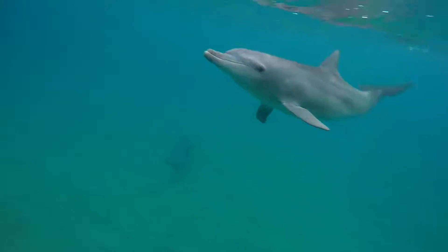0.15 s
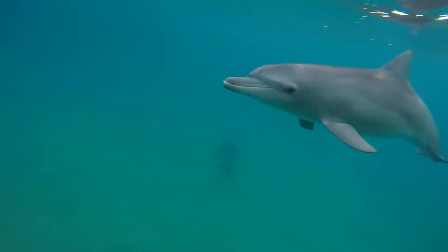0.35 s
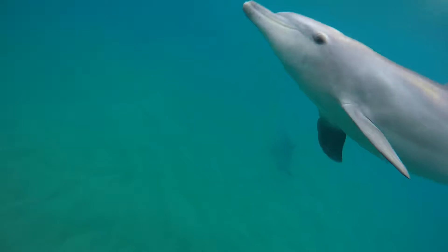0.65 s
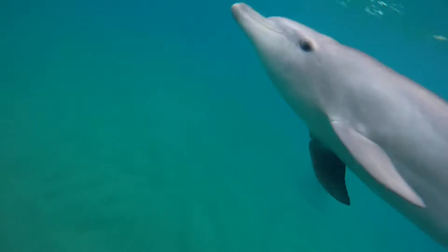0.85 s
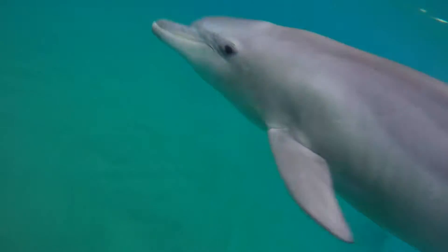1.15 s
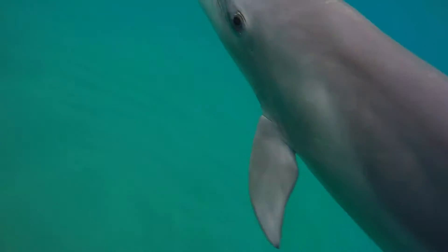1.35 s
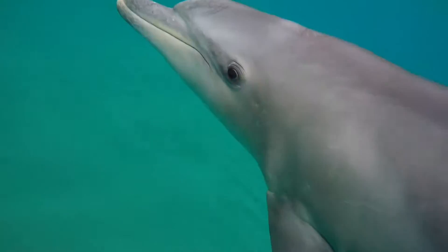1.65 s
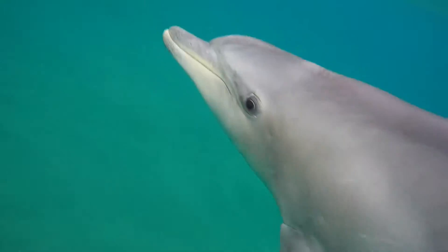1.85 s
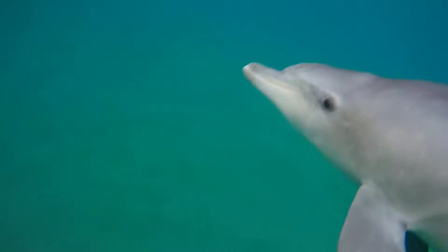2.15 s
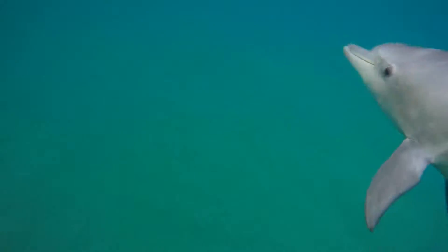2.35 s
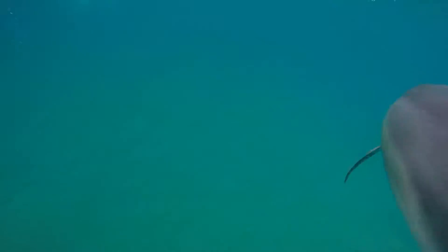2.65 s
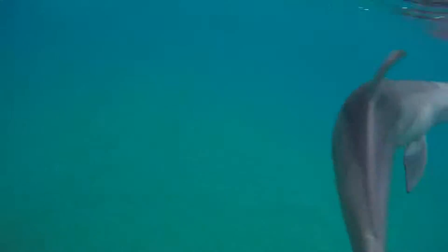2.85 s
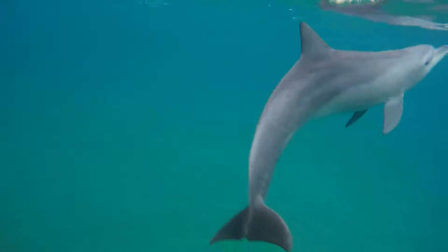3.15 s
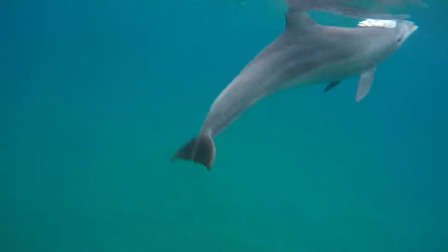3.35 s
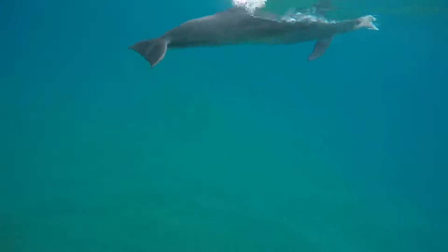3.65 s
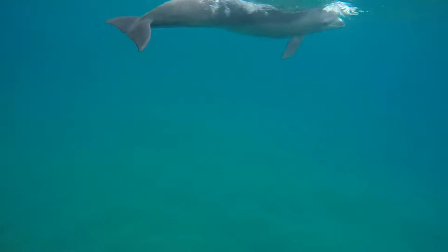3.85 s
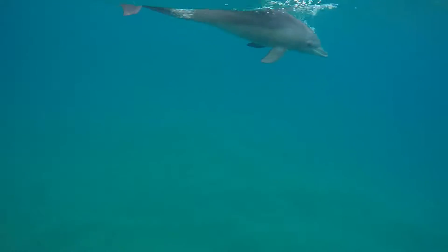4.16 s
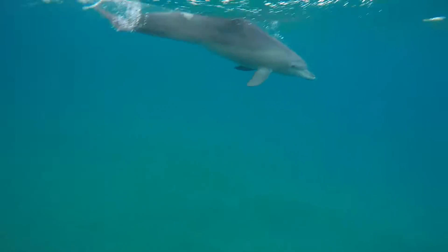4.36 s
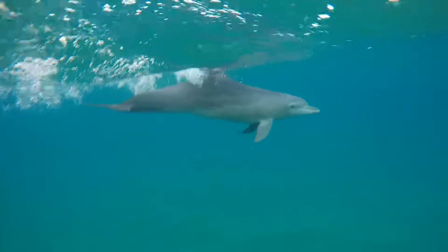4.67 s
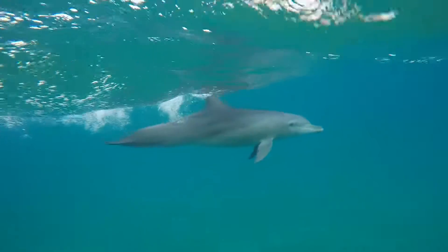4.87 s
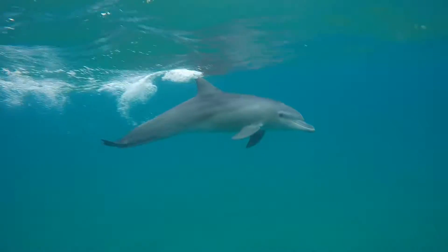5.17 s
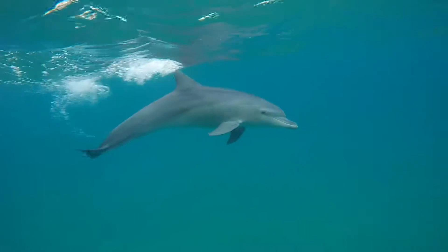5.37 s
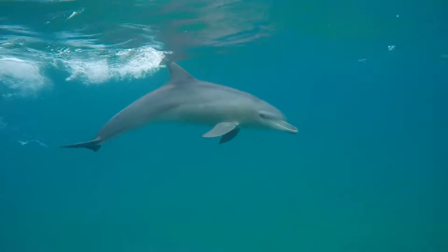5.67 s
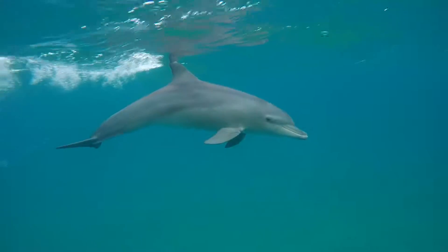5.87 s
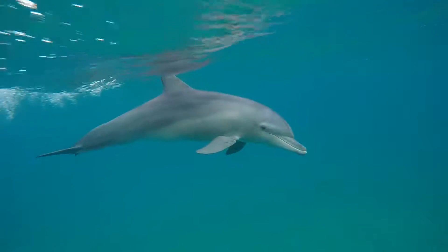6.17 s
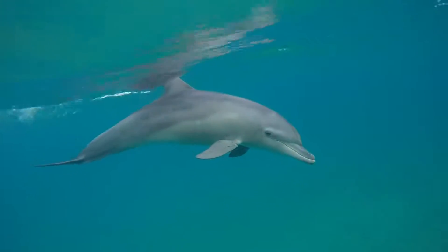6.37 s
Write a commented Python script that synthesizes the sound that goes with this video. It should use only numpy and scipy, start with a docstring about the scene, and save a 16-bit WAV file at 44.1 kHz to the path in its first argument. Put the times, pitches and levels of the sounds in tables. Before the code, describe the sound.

Underwater rumble and bubbly gurgling as a dolphin passes close, whistling, popping and clicking, then a short surface splash and two rising chirps.

```python
"""Water rumbles round a submerged housing in the open sea, and the surface gurgles, splashes and fizzes.
A dolphin passes close and rises: it whistles, fires a burst of pulses and a click train, then whistles twice.
A low hum sounds briefly during the clicks. Whistles and hum are gliding sines; pulses ring housing modes;
clicks are filtered impulses. Bubbles are damped sines; flow, wash, hiss and splash are shaped noise."""
import sys
import numpy as np
from scipy import signal
from scipy.fft import rfft, irfft, next_fast_len
from scipy.io import wavfile
from scipy.ndimage import uniform_filter1d, map_coordinates

SR = 44100
rng = np.random.default_rng(int(sys.argv[2]) if len(sys.argv) > 2 else 0)


def pcm_store(signal):
    """Save signal as 16-bit PCM."""
    levels = np.round(np.clip(np.atleast_2d(signal), -1, 1) * 32767)
    wavfile.write(sys.argv[1], SR, levels.astype(np.int16).T)


N = 287532

# whistle pitch, an arch and two upsweeps, one list each: time_s, pitch_hz
WHISTLE_PITCH = [
    [(.655, 6400), (.70, 6750), (.77, 10000), (.83, 11760), (.852, 13700), (.94, 15200), (.98, 14850),
     (1.054, 12200), (1.078, 11100), (1.178, 7760), (1.235, 7600)],
    [(5.52, 3940), (5.545, 4360), (5.56, 5570), (5.59, 6520), (5.65, 7100), (5.685, 8000), (5.725, 8700)],
    [(5.98, 2780), (6.03, 3550), (6.065, 5090), (6.125, 6720), (6.185, 7907), (6.28, 11050)],
]
# the same three whistles, before passage and edges: level_db, overtone_re_level_db, start_roughness_0_to_1
WHISTLE_LEVELS = [(-43, -1, 0.4), (-40.5, -23, 0.94), (-40.5, -13, 1)]
# how the housing passes a whistle, which swells and fades as it glides through: frequency_hz, gain_db
HOUSING_PASSAGE = [(2800, -14.5), (3500, 1.5), (4450, -6.5), (4950, -15.5), (5700, -4), (6700, -7.5),
                   (7900, -18), (9300, -7.5), (10400, -16), (11200, -7), (12000, -26), (13500, -15),
                   (14400, -11), (15300, -24)]
# pulses, weak to loud; the first is the housing ringing under the lone click:
# start_s, strength_db, brightness_db
PULSES = [(1.0699, -24.5, -1), (1.3657, -26, 8), (1.3712, -21, 14.5), (1.3767, -18.5, 13.5),
          (1.3831, -20.5, 15), (1.3892, -10, 7), (1.3963, -10.5, 4), (1.404, -19.5, 10),
          (1.4159, -20.5, 13), (1.4993, -6, 1), (1.5637, -6.5, -4.5), (1.5714, -10, -4), (1.5866, -10, -10)]
# housing modes rung by a pulse: frequency_hz, gain_db, t60_s
HOUSING_MODES = [(1010, -14.5, 0.016), (1177, -4.5, 0.0066), (1880, -15.5, 0.0077), (2655, -16, 0.028),
                 (2890, -3, 0.019), (4100, -12, 0.0066), (4950, -10, 0.0022), (6630, -16.5, 0.0021),
                 (9000, -23, 0.0025), (12940, -28, 0.00078)]
# echolocation train, quickening and then slackening: start_s, knock_peak_db
CLICKS = [(1.6302, -20.5), (1.7014, -13.5), (1.7906, -9.5), (1.8868, -9.5), (1.9758, -12.5), (2.034, -14),
          (2.0759, -13.5), (2.116, -14), (2.151, -14), (2.1878, -15.5), (2.226, -17), (2.2748, -18.5),
          (2.347, -24)]
# one harder click before the train: start_s, knock_peak_db, knock_top_hz
LONE_CLICK = (1.07, -5.5, 4240)
# low hum: time_s, pitch_hz
HUM_PITCH = [(1.91, 294.3), (1.98, 305), (2.03, 280.2), (2.13, 303.8), (2.22, 290.7), (2.38, 319)]
# the dolphin's back breaks the surface: time_s, level_db
SPLASH_LEVEL = [(3.12, -64), (3.18, -47), (3.2, -30.5), (3.235, -36.5), (3.27, -25.5), (3.34, -32.5),
                (3.42, -35.5), (3.55, -55)]
# splash spectrum: frequency_hz, relative_db_per_hz
SPLASH_SPECTRUM = [(110, 1.5), (180, -3), (280, -4.5), (450, 5.5), (620, 5), (800, -16.5), (1050, -19.5),
                   (1300, -59), (3500, -36), (7000, -65), (11000, -57), (15500, -61)]
# nearest big bubbles and wavelet slaps, before trim: start_s, level_db, pitch_hz, t60_s
GLOOPS = [(.04, -22.5, 531, 0.077), (.075, -27.5, 481, 0.26), (0.211, -23, 517, 0.13),
          (.477, -27, 633, 0.035), (.827, -26.5, 635, 0.046), (.88, -23.5, 612, 0.04),
          (1.038, -21.5, 597, 0.058), (1.26, -26, 588, 0.18), (1.944, -20.5, 564, 0.049),
          (1.99, -22, 598, 0.12), (2.275, -35, 860, .11), (2.323, -27, 590, 0.17), (2.494, -25, 689, 0.072),
          (2.673, -25, 656, 0.081), (2.79, -24.5, 649, 0.096), (2.946, -22, 550, 0.024),
          (3.047, -18.5, 660, 0.025), (3.195, -19, 544, 0.049), (3.32, -21, 422.5, 0.12),
          (4.087, -22, 574, 0.028), (5.399, -29, 520, 0.066), (5.483, -21, 441, 0.07),
          (5.733, -33.5, 564, .12)]
# nearest small ringing pops, before trim: start_s, level_db, pitch_hz
POPS = [(1.848, -34.5, 2700), (2.02, -35, 2500), (2.183, -29, 3840), (2.223, -27.5, 3560),
        (2.526, -29.5, 1786), (2.529, -33, 4360), (2.541, -31.5, 5320), (2.543, -32, 3100),
        (2.546, -44, 10700), (2.797, -39, 2600), (3.761, -35, 2540), (5.188, -42.5, 3880),
        (5.341, -41, 2670), (5.383, -43, 1340), (5.43, -40.5, 1630), (5.506, -39.5, 3900),
        (5.777, -43, 5360), (5.921, -43, 5060), (6.43, -39, 3400)]
# stirring of the surface, as gurgle level before trims: time_s, level_db
SURFACE_LEVEL = [(0, -41), (0.22, -42), (0.34, -49), (0.6, -45.5), (0.95, -44.5), (1.4, -42), (1.8, -45),
                 (2.0, -39), (2.12, -44.5), (2.35, -44), (2.75, -43), (3.05, -46), (3.35, -43),
                 (3.95, -53.5), (4.7, -45.5), (5.45, -49.5), (6.2, -51.5), (6.5, -43.5)]
# gurgle pitch, lower as its bubbles grow: time_s, pitch_ratio
GURGLE_PITCH = [(0, 0.98), (.9, 1.015), (1.5, 0.91), (2.8, 1.003), (3.3, 0.87), (4.0, 1.04), (4.8, .9),
                (5.4, 1.006), (6.5, 0.85)]
# gurgle spectrum: frequency_hz, relative_db_per_hz
GURGLE_SPECTRUM = [(120, -24), (200, -16.5), (298, -16.5), (386, -5), (418, -4), (481, 3.5), (589, 4.5),
                   (695, 0.5), (806, -9.5), (1140, -24.5), (1300, -55), (1690, -71), (2860, -120)]
# hiss of foam and of water rushing past, before trim: time_s, level_db
HISS_LEVEL = [(0, -65.5), (.8, -61.5), (1.5, -55.5), (2.3, -56.5), (2.9, -66.5), (3.75, -56.5), (4.25, -68),
              (4.9, -65.5), (5.45, -54.5), (6.1, -72), (6.5, -61.5)]
# resonances that colour the hiss: centre_hz, width_hz, relative_db
HISS_RINGS = [(1720, 380, 2), (2652, 355, 0.5), (3520, 890, -5), (5400, 190, -7.5), (9600, 1550, -19.5),
              (13900, 1200, -25)]
# broad hiss spectrum: frequency_hz, relative_db_per_hz
HISS_SPECTRUM = [(1000, 18.5), (1250, -34), (1700, 6), (2150, -15), (2650, -7), (3500, 8), (4500, -28),
                 (5400, -9), (7500, -32), (11000, -30), (15000, -48), (16000, -37)]
# steady far-sea spectrum: frequency_hz, relative_db_per_hz
FAR_SEA_SPECTRUM = [(1000, -21), (1300, -15.5), (1800, -5), (2500, -13), (4000, -5.5), (5500, -7.5),
                    (8000, -11.5), (15000, -15.5), (16000, -41)]
# flow round the housing, highest as the dolphin passes, as rumble level before eddies: time_s, level_db
FLOW_LEVEL = [(0, -23), (0.52, -31.5), (0.7, -23.5), (0.95, -23), (1.15, -16.5), (1.35, -14), (1.85, -17),
              (2.3, -26), (2.8, -35.5), (3.1, -29.5), (3.6, -31.5), (3.85, -32.0), (4.3, -32), (4.9, -31.5),
              (5.3, -38), (5.9, -24), (6.4, -32.5), (6.52, -22.5)]
# rumble spectrum: frequency_hz, relative_db_per_hz
RUMBLE_SPECTRUM = [(8.8, -59), (15, 2.5), (27, 4), (44, -2), (91, -17.5), (156, -25.5), (184, -23.5),
                   (233, -35), (300, -35), (390, -57.5), (660, -120)]
# spectrum of water rushing past the housing: frequency_hz, relative_db_per_hz
RUSH_SPECTRUM = [(150, 12.5), (300, -6.5), (700, -1.5), (1100, -8), (1600, -17.5), (3200, -21.5),
                 (4500, -51), (9000, -52.5), (15500, -38)]

RASP_S, RASP_BLUR_DB, RASP_SWING = 0.077, -6, .06   # the rasp clears in this time; swing is a pitch ratio
WHISTLE_ATTACK_S, WHISTLE_RELEASE_S = .025, 0.045
WHISTLE_START_DB, WHISTLE_END_DB = -15, -23   # each swells from, and sinks to, these offsets
PULSE_ECHO_MEAN_S, PULSE_ECHO_DB = 0.001536, -7.5
LOW_RING_DB, LOW_RING_FOLLOWS = -2, 0.31   # lowest modes; share of the brightness they gain too
KNOCK_TOP_HZ, CLICK_ECHO_DB = 2670, -12.5
TICK_DB, TICK_FOLLOWS, TICK_T60_S = -24.5, 0.48, .005   # at a 0 dB knock; share of the knock level followed
HUM_DB, HUM_ATTACK_S, HUM_FADE_DB_PER_S = -36, .075, 45
HUM_OCTAVE_DB, OCTAVE_EXTRA_FADE_DB_PER_S = 0.5, 101   # re the fundamental
SPRAY_DB = -63
CRACKLE_DB, SNAP_DB = -68.5, -16   # at mean hiss and mid-scene; snaps re the rings
CRACKLE_FOLLOWS, CRACKLE_GROWS_DB_PER_S = .3, 1.03   # share of the hiss's swing; the wake fills with bubbles
FAR_SEA_DB = -67.5
EDDY_DB, EDDY_RATE_HZ = 2.0, 12.7   # spread of the flow level
CUTOFF_HZ = 16000


def from_db(db):
    """Decibels to gain."""
    return 10 ** (np.asarray(db) / 20)


def rms_one(x):
    """Scale to rms 1."""
    return x / np.sqrt(np.mean(x ** 2) + 1e-20)


def in_time(rows):
    """Each column of a curve at every sample."""
    s, *columns = np.transpose(rows)
    return [np.interp(np.arange(N) / SR, s, c) for c in columns]


def sounding(rows, fade_s=0.0043):
    """1 between the first and last row of a curve, with short fades."""
    t = np.arange(N) / SR
    return np.clip(np.minimum(t - rows[0][0], rows[-1][0] - t) / fade_s, 0, 1)


def add(out, start_s, sound):
    """Mix a short sound in."""
    i = int(np.clip(round(start_s * SR), 0, N - 1))
    out[i:i + len(sound)] += sound[:N - i]


def noise(count=N):
    """White noise."""
    return rng.standard_normal(count)


def band(x, low_hz, high_hz, order=2):
    """Causal band-pass."""
    edges_hz = [low_hz, min(high_hz, SR / 2 - 500)]
    return signal.sosfilt(signal.butter(order, edges_hz, "band", fs=SR, output="sos"), x)


def drift(rate_hz):
    """Slow random wander with spread 1: noise through two equal low-pass poles."""
    r = np.exp(-40 * np.pi * rate_hz / SR)   # made at SR / 20
    slow = signal.lfilter([1], [1, -2 * r, r * r], noise(N // 20 + 2002))[2000:]
    return np.interp(np.arange(N) / 20, np.arange(len(slow)), rms_one(slow))


def colour(x, spectrum):
    """Apply a spectrum interpolated over log frequency; rms 1."""
    hz, db = np.transpose(spectrum)
    size = next_fast_len(N)
    f = np.maximum(np.arange(size // 2 + 1) * SR / size, 1)
    gain = from_db(np.interp(np.log(f), np.log(hz), db, left=-120, right=-120))
    return rms_one(irfft(rfft(x, size) * gain, size)[:N])


def grains(per_s, spread_db):
    """Random clicks, most of them small and a few large."""
    sizes = from_db(spread_db * np.minimum(rng.exponential(1, N), 4)) * rng.choice([-1, 1], N)
    return sizes * (rng.random(N) < per_s / SR)


def ringing(hz, t60_s, rise, attack_cycles):
    """Damped sine, envelope peak 1; a bubble's pitch rises as it nears the surface."""
    t = np.arange(int(t60_s * SR) + 2) / SR
    envelope = (1 - np.exp(-(t * hz / attack_cycles) ** 2)) * from_db(-60 * t / t60_s)
    return envelope / envelope.max() * np.sin(2 * np.pi * hz * t * (1 + rise * t / t60_s))


def scatter(x, wet_db, spread_s, count=40):
    """Faint, quickly dying reflections from the rippled surface."""
    out = x.copy()
    for late, size in zip(rng.uniform(0.037, 1, count), noise(count)):
        lag = int(late * spread_s * SR) + 1
        out[lag:] += x[:-lag] * size * from_db(wet_db - 24.3 * late) / np.sqrt(count / 7)
    return out


def whistles(waver=0.004, overtone_top_hz=15000, flutter_db=3.0, echo_db=-13.5, echo_spread_s=.05):
    """Nearly pure glides with flickering overtones; each begins with a rasp of fast pitch and level jitter."""
    out, t = np.zeros(N), np.arange(N) / SR
    for pitch, (db, overtone_db, first_rough) in zip(WHISTLE_PITCH, WHISTLE_LEVELS):
        since, left = t - pitch[0][0], pitch[-1][0] - t
        rough = first_rough * np.clip(1 - since / RASP_S, 0, 1)
        edge_db = WHISTLE_START_DB * np.clip(1 - since / WHISTLE_ATTACK_S, 0, 1)
        edge_db += WHISTLE_END_DB * np.clip(1 - left / WHISTLE_RELEASE_S, 0, 1)
        envelope = sounding(pitch) * from_db(db + edge_db + (flutter_db + 3.1 * rough) * drift(130))
        hz, = in_time(pitch)
        jittered_hz = hz * (1 + waver * drift(56) + RASP_SWING * rough * drift(400))
        phase = 2 * np.pi * np.cumsum(jittered_hz) / SR
        first, second, third = (
            from_db(np.interp(k * hz, *np.transpose(HOUSING_PASSAGE))) * np.sin(k * phase)
            for k in range(1, 4))
        # overtones fade as the fundamental nears half of overtone_top_hz
        overtone = from_db(overtone_db + drift(70)) / (1 + (2 * hz / overtone_top_hz) ** 20)
        blur = from_db(RASP_BLUR_DB) * rough * drift(500)
        tone = first * (1 + blur) + overtone * (second + rough * third)
        out += np.sqrt(2) * envelope * tone
    return scatter(out, echo_db, echo_spread_s)


def pulses(swell_cycles=2.05):
    """Each pulse and its close echo ring the housing a little differently; bright ones favour high modes."""
    out = np.zeros(N)
    for s, db, bright_db in PULSES:
        low_db = LOW_RING_DB + LOW_RING_FOLLOWS * bright_db
        tilt_limit_octaves = 1.3 if bright_db > 0 else 3
        echo = (PULSE_ECHO_MEAN_S * rng.uniform(.7, 1.3), PULSE_ECHO_DB)
        for lag_s, path_db in ((0, 0), echo):
            for (hz, mode_db, t60_s), (detune, late) in zip(HOUSING_MODES, noise((len(HOUSING_MODES), 2))):
                tilt_db = bright_db * np.clip(np.log2(hz / 2900), 0, tilt_limit_octaves)
                tilt_db += low_db * (hz < 1500)
                ring = ringing(hz * (1 + 0.035 * detune), t60_s, 0, swell_cycles)
                add(out, s + lag_s + abs(late) * .0001, from_db(db + path_db + mode_db + tilt_db) * ring)
    return scatter(out, -15.5, 0.0077)


def echolocation(skirt_db=-17.5, low_hz=1600):
    """Very short clicks: a bright noise tick on a dull knock, a band-passed impulse."""
    out, t = np.zeros(N), np.arange(SR // 40) / SR
    impulse = signal.unit_impulse(len(t))
    for s, db, top_hz in [LONE_CLICK] + [(s, db, KNOCK_TOP_HZ) for s, db in CLICKS]:
        knock = band(band(impulse, low_hz, top_hz, order=5), 1130, 8200, order=8)
        knock += from_db(skirt_db) * band(impulse, top_hz * 0.91, top_hz * 1.24)
        tick = band(noise(len(t)) * from_db(-60 * t / TICK_T60_S), 5100, 15600)
        click = from_db(db) * knock / np.abs(knock).max()
        click += from_db(TICK_DB + TICK_FOLLOWS * db) * tick / np.abs(tick).max()
        add(out, s, scatter(click, CLICK_ECHO_DB, 0.012))
    return out


def hum():
    """A soft low tone that swells, wavers and fades, its octave faster."""
    hz, = in_time(HUM_PITCH)
    since = np.arange(N) / SR - HUM_PITCH[0][0]
    fading_s = np.maximum(since - HUM_ATTACK_S, 0)
    swell = np.clip(since / HUM_ATTACK_S, 0, 1) ** 2
    envelope = sounding(HUM_PITCH) * swell * from_db(HUM_DB - HUM_FADE_DB_PER_S * fading_s)
    phase = 2 * np.pi * np.cumsum(hz * (1 + 0.0128 * drift(39))) / SR
    octave = from_db(HUM_OCTAVE_DB - OCTAVE_EXTRA_FADE_DB_PER_S * fading_s) * np.sin(2 * phase)
    return np.sqrt(2) * envelope * (np.sin(phase) + octave)


def splash(churn_db=2.5, spray_s=3.247, spray_width_s=0.018):
    """A short, churning cloud of air dragged under, with a brief swish of spray."""
    db, = in_time(SPLASH_LEVEL)
    envelope = sounding(SPLASH_LEVEL) * from_db(db + churn_db * drift(66.6))
    churn = envelope * colour(noise(), SPLASH_SPECTRUM)
    swish = np.exp(-((np.arange(N) / SR - spray_s) / spray_width_s) ** 2)
    return churn + from_db(SPRAY_DB) * swish * rms_one(band(noise(), 8000, 12000, order=1))


def near_bubbles(gloop_trim_db=-0.5, slap_db=-17.0, pop_trim_db=-2.0, pop_t60_s=0.017):
    """Single gloops, each begun by a soft noise slap, and small chirping pops with a noise spit."""
    gloops, pops = np.zeros(N), np.zeros(N)
    t = np.arange(SR // 10) / SR
    for s, db, hz, t60_s in GLOOPS:
        swell = 1 - np.exp(-t / .003)
        slap = rms_one(band(noise(len(t)), hz * 0.7, hz * 1.09, order=3)) * swell * from_db(-60 * t / t60_s)
        add(gloops, s, from_db(db) * ringing(hz, t60_s, 0.043, 1.17))
        add(gloops, s, from_db(db + slap_db) * slap)
    for s, db, hz in POPS:
        spit = rms_one(band(noise(len(t)), hz * 0.9, hz * 1.54)) * from_db(-60 * t / 0.0059)
        add(pops, s, from_db(db) * ringing(hz, pop_t60_s, 0.014, 3.2))
        add(pops, s, from_db(db - 5.0) * spit)
    gloops = from_db(gloop_trim_db) * scatter(gloops, -11, 0.11)
    return gloops + from_db(pop_trim_db) * scatter(pops, -10.5, 0.036)


def gurgle(gurgle_db, wash_db=-2.5, bubbles_db=-0.5, per_s=12, cycles=16, count=16):
    """A wash of many large bubbles, with nearer ones ringing out of it."""
    rings = sum(
        signal.oaconvolve(grains(per_s, 3.87), ringing(hz, cycles / hz, 0.083, 1.0))[:N]
        for hz in np.geomspace(280, 1000, count))
    wash = colour(noise(), GURGLE_SPECTRUM) * from_db(5.0 * drift(8.6))
    water = from_db(wash_db) * wash + from_db(bubbles_db) * colour(rings, GURGLE_SPECTRUM)
    ratio, = in_time(GURGLE_PITCH)
    # bigger bubbles ring slower: read at a varying speed
    resampled = map_coordinates(water, [np.cumsum(ratio)], order=3, mode="mirror")
    return from_db(gurgle_db) * resampled


def crackle(level_db, per_s=14, t60_s=0.014, tilt_db_per_octave=1.0, count=16):
    """Tiny bubbles chirp at random; sharper snaps, filtered clicks, join them."""
    rings = sum(
        from_db(tilt_db_per_octave * np.log2(hz / 3500))
        * signal.oaconvolve(grains(per_s, 4.0), ringing(hz, t60_s, 0.076, 2.3))[:N]
        for hz in np.geomspace(1400, 6500, count))
    snaps = band(grains(25, 3.9), 5000, 13000)
    return from_db(level_db) * (rms_one(rings) + from_db(SNAP_DB) * rms_one(snaps))


def fizz(hiss_db, hiss_trim_db=-2.0, broad_db=-11.5, flicker_db=4.5):
    """Hiss of foam and of water rushing past, flickering in a few resonances, over the steady far sea."""
    rings = sum(
        band(noise(), hz - width_hz / 2, hz + width_hz / 2) * from_db(db + flicker_db * drift(25))
        for hz, width_hz, db in HISS_RINGS)
    hiss = rms_one(rings) + from_db(broad_db) * colour(noise(), HISS_SPECTRUM)
    far_sea = from_db(FAR_SEA_DB) * colour(noise(), FAR_SEA_SPECTRUM)
    return from_db(hiss_db + hiss_trim_db) * hiss + far_sea


def flow(flow_db, rush_db=-29.0):
    """Eddies on the housing rumble; a weak rush grows faster than they do with the flow."""
    rumble = colour(noise(), RUMBLE_SPECTRUM)
    rumble /= np.sqrt(uniform_filter1d(rumble ** 2, SR // 7) + 0.039)   # even strength in a steady flow
    surge_db = uniform_filter1d(flow_db, SR // 4)
    rush_level_db = surge_db + 0.2 * (surge_db - surge_db.max()) + rush_db
    rush = from_db(rush_level_db) * colour(noise(), RUSH_SPECTRUM)
    return from_db(flow_db) * rumble + rush


def scene():
    """The dolphin over the moving water, in one channel."""
    (flow_db,), (gurgle_db,), (hiss_db,) = in_time(FLOW_LEVEL), in_time(SURFACE_LEVEL), in_time(HISS_LEVEL)
    t = np.arange(N) / SR
    crackle_db = CRACKLE_DB + CRACKLE_FOLLOWS * (hiss_db - hiss_db.mean())
    crackle_db += CRACKLE_GROWS_DB_PER_S * (t - t.mean())
    dolphin = whistles() + pulses() + echolocation()
    water = splash() + near_bubbles() + gurgle(gurgle_db) + crackle(crackle_db) + fizz(hiss_db)
    eddying_flow = flow(flow_db + EDDY_DB * drift(EDDY_RATE_HZ))
    return (dolphin + hum() + water + eddying_flow)[None]


def record(dry):
    """Steep elliptic low-pass."""
    return signal.sosfilt(signal.ellip(10, .1, 90, CUTOFF_HZ, fs=SR, output="sos"), dry)


dry = scene()
out = record(dry)
pcm_store(out)
```